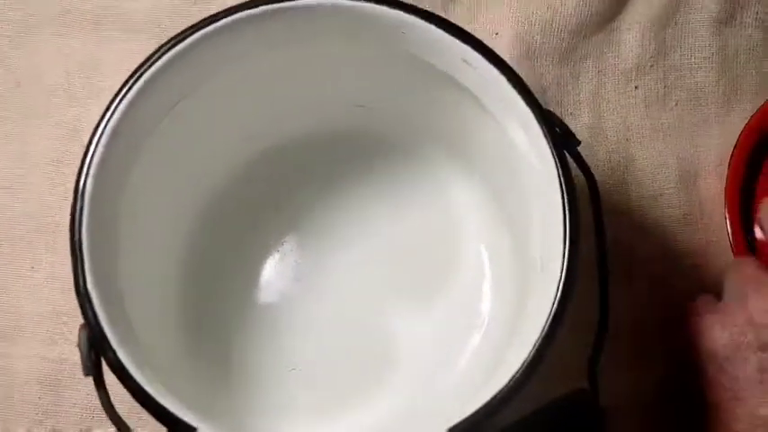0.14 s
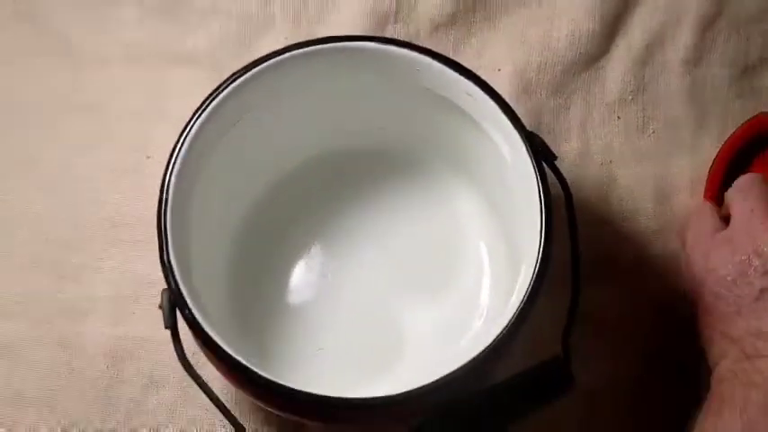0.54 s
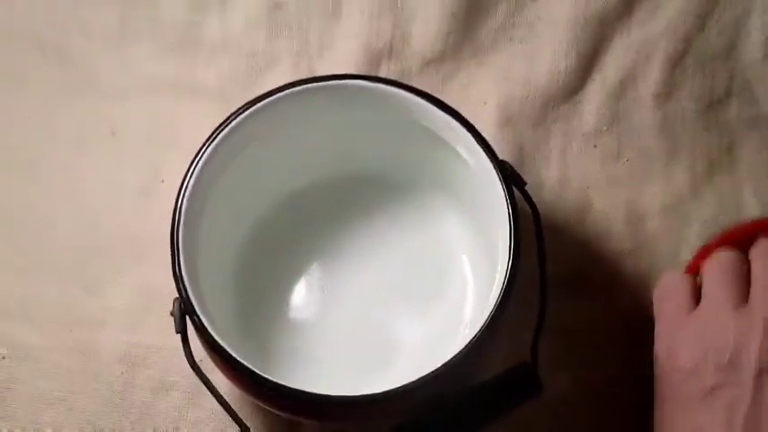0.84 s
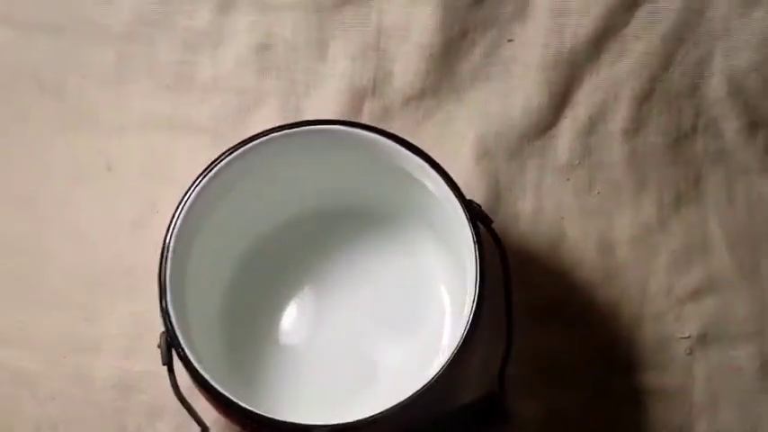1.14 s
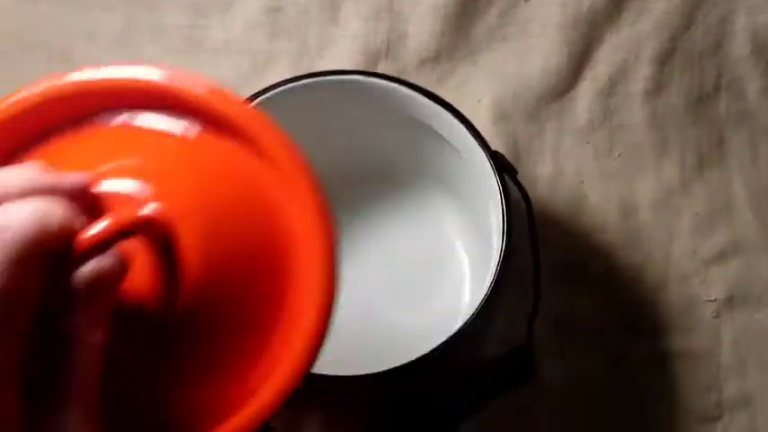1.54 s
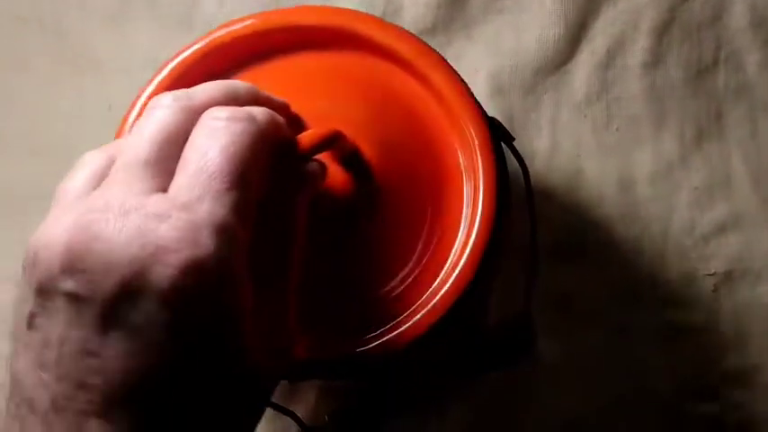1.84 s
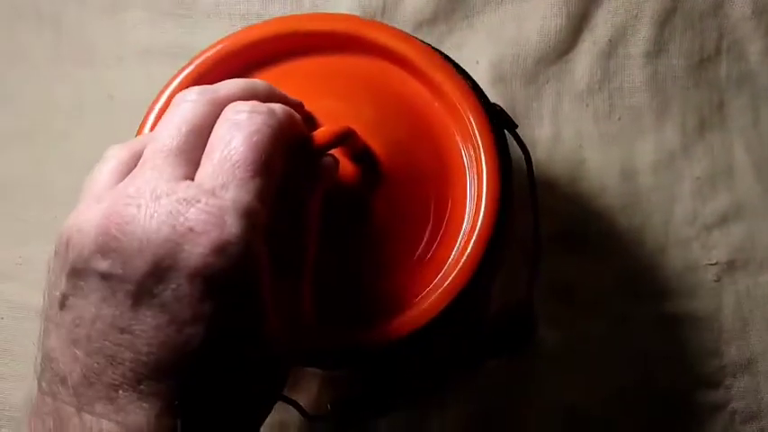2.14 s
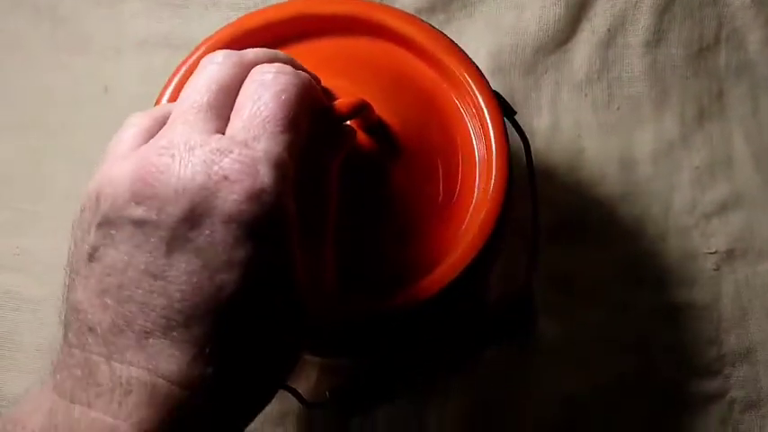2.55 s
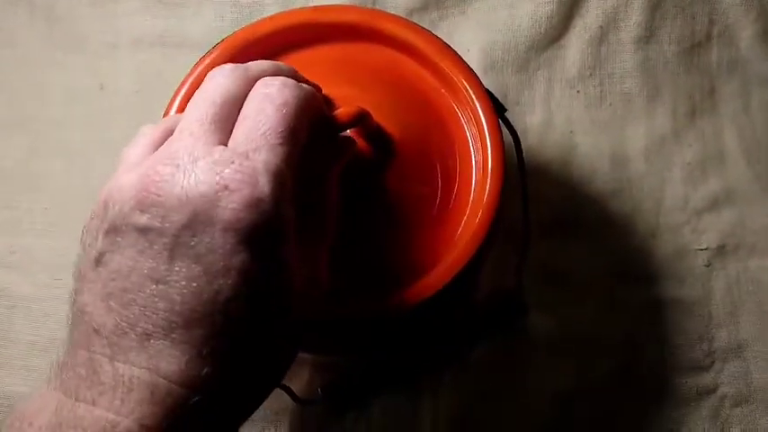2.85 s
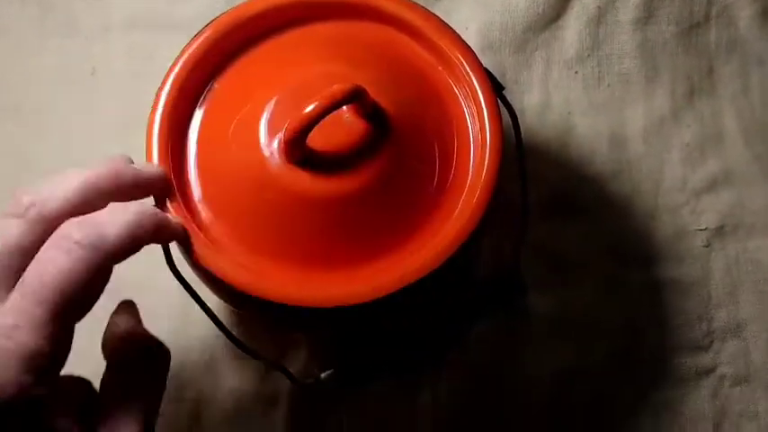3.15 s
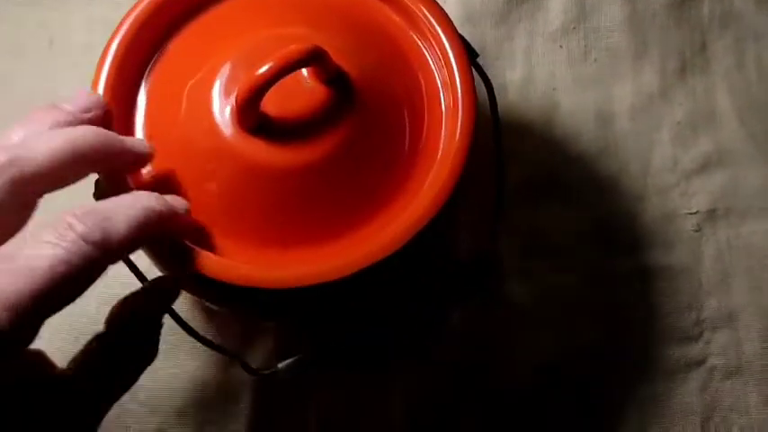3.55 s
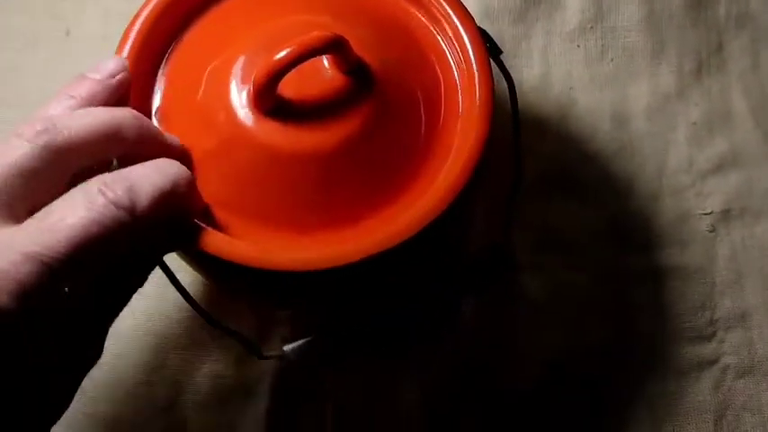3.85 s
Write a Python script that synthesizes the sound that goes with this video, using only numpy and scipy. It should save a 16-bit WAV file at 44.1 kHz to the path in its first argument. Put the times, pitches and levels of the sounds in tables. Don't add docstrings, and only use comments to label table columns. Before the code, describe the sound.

Enamel lid clanks onto an enamelled metal can, scrapes, drops into place and gets nudged

```python
import sys
import numpy as np
from scipy import signal
from scipy.fft import rfft, irfft, next_fast_len
from scipy.io import wavfile

SR = 44100
rng = np.random.default_rng(int(sys.argv[2]) if len(sys.argv) > 2 else 0)


def transcribe(u):
    v = np.clip(np.atleast_2d(u).T, -1, 1)
    q = np.round(v * 32767).astype(np.int16)
    wavfile.write(sys.argv[1], SR, q)


def boost_factor(decibels):
    exponent = np.asarray(decibels, float) / 20
    return 10 ** exponent


N = 176400

# f/Hz, level/dB per Hz
ROOM_TONE = [(20, -6.5), (90, -20), (200, -2), (330, -10), (870, -12.5), (1220, -23), (2000, -24),
             (9000, -41)]
# f/Hz, likeness/0-1
LIKENESS = [(60, 0.78), (200, 0), (600, 0.2), (1500, 0), (9000, 0)]
# f/Hz, left-right level/dB
LEAN = [(60, 6), (250, 1), (700, 4.5), (3000, 4), (12000, 7.5)]
# t/s, level/dB
CLOTH = [(0, -64), (.4, -70), (.7, -67), (1.45, -67), (1.7, -70), (2.05, -77), (3.1, -70), (3.4, -74),
         (3.7, -71), (4, -61.5)]
# f/Hz, level/dB, pitch wander/Hz
HUM = [
    (118, -62.5, 0.33),
    (259.4, -61, 2.99),
    (513, -73.5, 4.8),
]
# t/s, level/dB, t60/s, centre f/Hz
CREAKS = [
    (.058, -44, 0.089, 4700),
    (.27, -58.5, 0.18, 5140),
    (1.012, -54.5, 0.15, 7140),
    (.58, -53, 0.36, 2800),
    (1.349, -54, 0.56, 1900),
    (1.449, -57, 0.25, 5350),
    (3.211, -48.5, 0.08, 6950),
]
# t/s, level/dB, chatter length/s
GRIP_HITS = [
    (.058, -50, 0.0013),
]
# t/s, f/Hz, level/dB, t60/s
AIR_PUFFS = [(0.059, 257, -44, .08), (2.129, 329, -18, 0.11), (2.134, 58.7, -43, 0.095),
             (2.156, 336, -25.5, 0.089), (2.70, 314.7, -40.5, 0.71), (2.753, 276, -20.5, 0.059),
             (2.755, 189.2, -27, 0.47), (2.767, 183.3, -25, 0.41), (2.865, 346, -25, 0.061),
             (2.868, 185.2, -23.5, 0.18), (3.221, 82.2, -37, 0.09), (3.806, 340, -28, 0.057),
             (3.812, 182, -28, 0.16), (3.832, 83.5, -39.5, 0.078)]
# t/s, f/Hz, level/dB
SQUEAK = [(.6, 8000, -88), (.64, 8600, -77), (.69, 9150, -78), (.75, 8750, -80), (.82, 7700, -86),
          (.87, 8350, -80), (.93, 9400, -82), (.98, 9650, -83), (1.02, 9300, -90)]
# t/s, level/dB, chatter length/s
TILTED_HITS = [
    (2.1264, -11.5, 0.0022),
    (2.131, -13, 0.003),
    (2.139, -23, 0.0048),
    (2.146, -27, 0.0019),
    (2.149, -24.5, .003),
    (2.153, -20.5, 0.0019),
    (2.158, -24, 0.0024),
    (2.697, -35, 0.021),
    (2.738, -39, 0.019),
]
# t/s, level/dB, chatter length/s
SEATING_HITS = [
    (2.7516, -20.5, 0.0065),
    (2.766, -19.5, 0.017),
    (2.791, -35, 0.031),
    (2.814, -29, 0.016),
    (2.853, -26, 0.028),
]
# t/s, level/dB, chatter length/s
ROCKING_HITS = [
    (2.8624, -22.5, 0.0077),
    (2.869, -22.5, 0.0014),
    (2.874, -26, 0.0056),
    (2.958, -41.5, 0.023),
]
# t/s, level/dB, chatter length/s
NUDGE_HITS = [
    (3.789, -51, 0.0092),
    (3.803, -26, 0.00095),
    (3.807, -27.5, 0.014),
    (3.816, -32, 0.0025),
    (3.833, -38, 0.026),
]
# t/s, level/dB, chatter length/s
DULL_HITS = [
    (2.281, -35, 0.0032),
    (2.342, -55, .004),
    (2.465, -40, 0.0047),
    (2.625, -48, 0.0034),
    (2.9615, -29.5, .007),
]
# t/s, level/dB
SLIDE = [(2.2, -102), (2.3, -61), (2.41, -74.5), (2.45, -54.5), (2.5, -63.5), (2.55, -64.5), (2.595, -55),
         (2.65, -59), (2.69, -96), (2.74, -87)]
# t/s, level/dB
RUB = [(3.2, -93), (3.31, -83), (3.335, -64.5), (3.37, -71), (3.41, -63), (3.455, -77), (3.475, -62),
       (3.53, -88), (3.6, -100)]
# f/Hz, level/dB, t60/s
SLIDE_BODY = [
    (1430, 2, .06),
    (1510, -1, .08),
    (630, 3, 0.072),
]
LID_HZ = [835, 1427, 2090, 3074, 3905, 4690, 5330, 5425, 6135, 6243, 6555, 7090, 7635]
# t60/s, level/dB tilted, seating, rocking, nudged
LID_MODES = [(0.09, -24, -25.5, -12.5, 10.5), (0.084, -3.5, -21, -24, -20),
             (0.083, -14.5, -11.5, -24.5, -3), (0.061, 0.5, -5, -13.5, -8), (0.062, -6, -0.5, -1.5, 7),
             (0.096, -9.5, -20.5, -25, -9.5), (0.039, -1, 1, 4.5, 10.5), (0.051, -4.5, -6.5, -3, -2),
             (0.076, -14, -4, -21.5, 3), (0.038, 1, -19, 10.5, -10), (0.027, -41.5, -46, -20.5, 7.5),
             (0.05, -10.5, -23, 4, 4), (0.05, 0, -11.5, 1.5, 2)]
WALL_AND_LID_HZ = [1500, 2515, 2742, 3020, 4070, 5895, 586, 1309, 2714, 3640, 4527, 6806]
# t60/s, level/dB tilted, seating, rocking, nudged
WALL_AND_LID_MODES = [(0.32, -27, -12.5, -13.5, -22), (0.41, -29, -25, -28, -21), (0.62, -24, -16, -24.5, -10.5),
                      (.18, -20.5, -24, -17.5, -20), (.2, -32, -26, -22, -17), (0.91, -41.5, -36, -24.5, -37),
                      (0.087, -18, -12.5, -31, -11), (0.057, -8.5, -6, -14.5, 2), (.15, -20, -18, -13.5, -11.5),
                      (.08, -14, -17, -4, -11), (.1, -12, -18, 7, -20), (.12, -23, -27, -15.5, -9)]
RIM_HZ = [8600, 9250, 9850, 10600, 11400, 11850, 12500, 13200, 13700, 14200, 14950, 15600]
# t60/s, level/dB tilted, seating, rocking, nudged
RIM_MODES = [(0.095, -25.5, -13, -12, -20), (.1, -30, -18.5, -16, -20), (.09, -38, -22.5, -22, -24),
             (0.36, -44.5, -19.5, -21, -14.5), (0.2, -33, -23.5, -31, -23.5), (.14, -28.5, -31, -25, -25),
             (.12, -31, -31.5, -25, -27), (0.12, -33.5, -24.5, -28, -29), (.13, -39.5, -28.5, -26, -28),
             (.13, -36, -29.5, -27.5, -30), (.11, -43, -33.5, -28, -39), (.11, -37.5, -37.5, -31, -29)]
# f/Hz, level/dB
CROWD = [(300, -15.5), (550, -2.5), (1500, 1), (2000, -7), (5500, -2), (8000, -9.5), (10000, -26),
         (16000, -28)]
CROWD_DB_BY_POSE = (-15, -11, -9.5, -5)
RIM_DB_BY_POSE = (-4, 3, 0.5, 3.5)

ROOM_TONE_DB, CLOTH_LOW_HZ, CLOTH_HIGH_HZ = -58, 2540, 10350
TONE_EDGE_HZ, ABOVE_EDGE_DB, AIR_TOP_HZ = 7900, -15, 13000
CAN_LEFT_DB, MODE_PAN_SPREAD_DB, PORTS_ALIKE_BELOW_HZ, LEFT_LAG_S = 2, 7.5, 2130, 0.00021
NAMED_TURN_MAX = 1.0
CROWD_SIZE, CROWD_T60_S = 190, 0.06
STRIKE_SPREAD_DB, NAMED_SPREAD_DB = 6.5, 3
RISE_S, EARLY_DB, EARLY_S = 0.0017, 8, 0.018
SLIPS_PER_S, TOUCH_SHARE = 2700, 0.42
GRIP_CROWD_DB, GRIP_RIM_DB, GRIP_THIN_BELOW_HZ = 2.5, 8.5, 3940
DULL_ABOVE_HZ, STEEL_LOW_CUT_HZ = 1970, 357
SLIDE_AIR_HZ, SLIDE_AIR_DB, SLIDE_RIM_DB = 340, 10, 2
SLIDE_SMOOTH = 1.07
ROOM_T60_S, ROOM_DB, WALL_CUT_HZ = 0.25, -15.5, 11100


def rms_one(x):
    return x / np.sqrt(np.mean(x ** 2) + 1e-20)


def in_time(rows):
    s, *columns = np.transpose(rows)
    return [np.interp(np.arange(N) / SR, s, c) for c in columns]


def at_hz(points, hz):
    table_hz, value = np.transpose(points)
    return np.interp(np.log(hz), np.log(table_hz), value)


def drift(rate):
    r = np.exp(-80 * np.pi * rate / SR)
    slow = signal.lfilter([1], [1, -2 * r, r * r], rng.standard_normal(N // 40 + 2002))[2000:]
    return np.interp(np.arange(N) / 40, np.arange(len(slow)), rms_one(slow))


def band(x, low_hz, high_hz):
    edges = [low_hz, min(high_hz, .45 * SR)]
    return signal.sosfilt(signal.butter(2, edges, "band", fs=SR, output="sos"), x)


def low_pass(x, order, hz):
    return signal.sosfilt(signal.butter(order, hz, fs=SR, output="sos"), x)


def high_pass(x, hz):
    return signal.sosfilt(signal.butter(2, hz, "high", fs=SR, output="sos"), x)


def place(sound, start_s):
    out, i = np.zeros((2, N + 2 * SR)), int(start_s * SR)
    out[:, i:i + sound.shape[1]] = sound
    return out[:, :N]


def ports(hz):
    apart = np.minimum(1, (hz / PORTS_ALIKE_BELOW_HZ) ** 2)
    turn, lean = rng.uniform(-1.07, 1, (2,) + np.shape(hz))
    side = np.array([.5, -.5]).reshape((2,) + (1,) * np.ndim(hz))
    phase = np.pi * (apart * turn - 2 * hz * LEFT_LAG_S) * side
    gain = boost_factor((CAN_LEFT_DB + 2 * apart * lean * MODE_PAN_SPREAD_DB) * side)
    return phase, gain


def ring(force, hz, t60):
    pole = boost_factor(-60 / (t60 * SR)) * np.exp(2j * np.pi * hz / SR)
    swing = signal.lfilter([1], [1, -pole], force + 1e-18)
    phase, gain = ports(hz)
    return (swing * np.exp(1j * phase[:, None])).imag * gain[:, None]


def grit(size):
    slips = rng.random(size) < SLIPS_PER_S / SR
    return rms_one(slips * rng.standard_normal(size) * rng.exponential(1, size))


def chatter(hits):
    first, last = hits[0][0], hits[-1][0]
    t = np.arange(int((last - first + .1) * SR)) / SR + first
    forces = []
    for s, db, length in hits:
        touch = TOUCH_SHARE * (t < s + 1 / SR)
        slips = np.exp(-np.abs(t - s) / length) * grit(SR)[:len(t)] / np.sqrt(length * SR)
        forces.append(boost_factor(db) * (t >= s) * (touch + slips))
    return t[0], np.array(forces)


def steel_body():
    named = np.array(LID_MODES + WALL_AND_LID_MODES + RIM_MODES)
    count = len(named)
    crowd_hz = 350 + 15300 * np.linspace(0, 1, CROWD_SIZE) ** 1.5
    crowd_hz = crowd_hz * rng.uniform(.99, 1.01, CROWD_SIZE)
    hz = np.append(LID_HZ + WALL_AND_LID_HZ + RIM_HZ, crowd_hz)
    t60 = np.append(named[:, 0], CROWD_T60_S * rng.uniform(0.7, 1.03, size=CROWD_SIZE))

    phase, gain = ports(hz)
    turn = np.angle(np.exp(2j * phase[0, :count])) / 2
    turn = np.clip(turn, -NAMED_TURN_MAX, NAMED_TURN_MAX)
    phase[:, :count] = turn, -turn

    t = np.arange(SR // 3)[:, None] / SR
    swell = 1 - np.exp(-t / RISE_S)
    early_fall = boost_factor(EARLY_DB * (np.exp(-t / EARLY_S) - 1))
    fade = boost_factor(-60 * t / t60) * swell * early_fall
    rings = [fade * g * np.sin(2 * np.pi * hz * t + p) for p, g in zip(phase, gain)]
    spread_db = np.where(np.arange(len(hz)) < count, NAMED_SPREAD_DB, STRIKE_SPREAD_DB)[:, None]

    def strike(forces, pose, crowd_db, rim_db=0):
        db = np.append(named[:, 1 + pose], crowd_db + at_hz(CROWD, crowd_hz))
        db = db + rim_db * (hz > TONE_EDGE_HZ - 200)
        chance = np.clip(rng.standard_normal((len(forces), len(hz))).T, -2.5, 1.5)
        strength = boost_factor(db[:, None] + spread_db * chance)
        return np.array([signal.fftconvolve((r @ strength).T, forces, axes=1).sum(axis=0) for r in rings])
    return strike


def room_tone():
    out, edges = 0, 16 * 2 ** np.arange(0, 10.5, .5)
    white = rng.standard_normal((2, 2, N))
    for k, (low, high) in enumerate(zip(edges, edges[1:])):
        mid, side = band(white[k % 2], low, high)
        hz = np.sqrt(low * high)
        alike = np.clip(at_hz(LIKENESS, hz), -1, 1)
        lean_db = at_hz(LEAN, hz) * np.array([[.5], [-.5]])
        gain = boost_factor(at_hz(ROOM_TONE, hz) + 2.3 * drift(36) + lean_db)
        out = out + gain * (np.sqrt(1 + alike) * mid + np.sqrt(1 - alike) * side * [[1], [-1]])
    return boost_factor(ROOM_TONE_DB) * rms_one(out)


def cloth_hiss():
    hiss = rms_one(band(rng.standard_normal((2, N)), CLOTH_LOW_HZ, CLOTH_HIGH_HZ))
    return boost_factor(in_time(CLOTH)[0] + drift(14)) * hiss


def background():
    both = room_tone() + cloth_hiss()
    return low_pass(both, 8, TONE_EDGE_HZ) + boost_factor(ABOVE_EDGE_DB) * low_pass(both, 4, AIR_TOP_HZ)


def hum():
    out = 0
    for hz, db, wander in HUM:
        level = np.sqrt(2) * boost_factor(db + 1.5 * drift(6) + np.array([[1.2], [-1.2]]))
        out = out + level * np.sin(2 * np.pi * np.cumsum(hz + wander * drift(7.6)) / SR)
    return out


def creaks():
    out, t = 0, np.arange(SR // 2) / SR
    for s, db, t60, hz in CREAKS:
        noise = band(rng.standard_normal((2, len(t))), hz * 0.69, hz * 1.2)
        out = out + place(boost_factor(db - 60 * t / t60) * noise, s)
    return out


def grip(strike):
    start, forces = chatter(GRIP_HITS)
    tick = strike(forces, 0, GRIP_CROWD_DB, GRIP_RIM_DB)
    return place(high_pass(tick, GRIP_THIN_BELOW_HZ), start)


def air():
    out, t = 0, np.arange(SR // 2) / SR
    for s, hz, db, t60 in AIR_PUFFS:
        push = np.sin(2 * np.pi * hz * t) * (t < 1 / hz) * 2 * hz / SR
        out = out + place(ring(boost_factor(db) * push, hz, t60), s)
    return out


def squeak():
    hz, db = in_time(SQUEAK)
    i = np.arange(N)
    on = (i > SQUEAK[0][0] * SR) & (i < SQUEAK[-1][0] * SR)
    port_phase = np.array([[0], [1.2]])
    return on * boost_factor(db + 2 * drift(32)) * np.sin(2 * np.pi * np.cumsum(hz) / SR + port_phase)


def clanks(strike):
    out = 0
    for pose, hits in enumerate((TILTED_HITS, SEATING_HITS, ROCKING_HITS, NUDGE_HITS)):
        start, forces = chatter(hits)
        out = out + place(strike(forces, pose, CROWD_DB_BY_POSE[pose], RIM_DB_BY_POSE[pose]), start)
    return out


def sliding(strike):
    out = 0
    for curve, pose, air_db, body_db in ((SLIDE, 0, SLIDE_AIR_DB, 0.5), (RUB, 2, -30, -12.0)):
        start, end = int(curve[0][0] * SR), int(curve[-1][0] * SR)
        level = boost_factor(in_time(curve)[0] + 1.5 * drift(38) - 34.5)
        force = (level * (grit(N) + SLIDE_SMOOTH * rng.standard_normal(N)))[start:end]
        path = np.linspace(0, 6, len(force)) - np.arange(7)[:, None]
        spots = np.maximum(0, 1 - np.abs(path)) ** .5
        steel = strike(force * spots, pose, -4., SLIDE_RIM_DB)
        can_air = sum(ring(force * boost_factor(air_db), SLIDE_AIR_HZ * k, 0.22) for k in (1, .88))
        held_lid = sum(ring(force * boost_factor(db + body_db), hz, t60) for hz, db, t60 in SLIDE_BODY)
        for sound in (steel, can_air, held_lid):
            out = out + place(sound, start / SR)
    return out


def dull_knocks(strike):
    start, forces = chatter(DULL_HITS)
    return place(band(strike(forces, 0, -7.5), 410, DULL_ABOVE_HZ), start)


def room(x):
    size = next_fast_len(N + SR)
    w = 2 * np.pi * np.arange(size // 2 + 1) / size
    dull = np.exp(-2 * np.pi * WALL_CUT_HZ / SR)
    wall = (1 - dull) / (1 - dull * np.exp(-1j * w))
    echo = np.zeros((2, len(w)), complex)
    for k, lag in enumerate((rng.uniform(.008, .03, 16) * SR).astype(int)):
        loop = boost_factor(-60 * lag / SR / ROOM_T60_S) * np.exp(-1j * w * lag) * wall
        echo[k % 2] += loop / (1 - loop) * (-1) ** (k // 2)
    return irfft(echo * rfft(x[0], size), size)[:, :N]


def scene():
    strike = steel_body()
    metal = grip(strike) + clanks(strike) + sliding(strike) + dull_knocks(strike)
    metal = high_pass(metal, STEEL_LOW_CUT_HZ)
    puffs = high_pass(air(), 55)
    reverb = boost_factor(ROOM_DB) * room(metal + boost_factor(-1.5) * puffs)
    return background() + hum() + creaks() + puffs + squeak() + metal + reverb


def top_cut(x):
    return signal.sosfilt(signal.butter(12, 16850, fs=SR, output="sos"), x)


def record(dry):
    return top_cut(dry)


dry = scene()
out = record(dry)
transcribe(out)
```